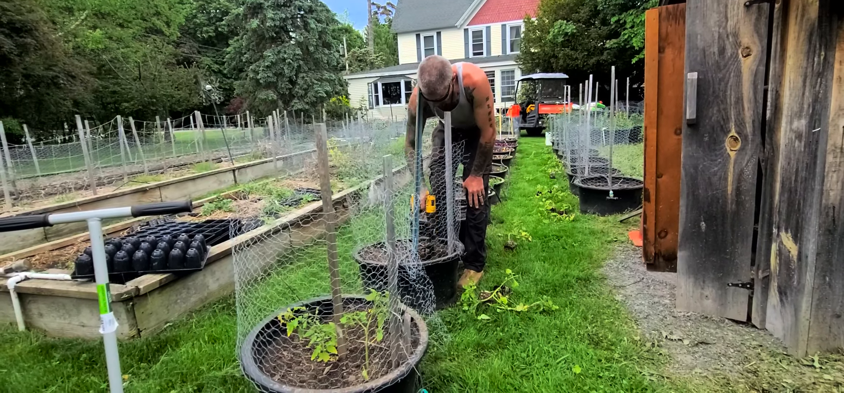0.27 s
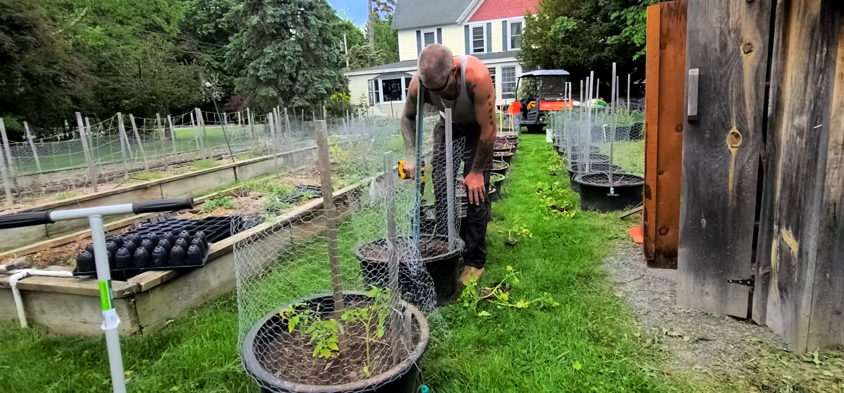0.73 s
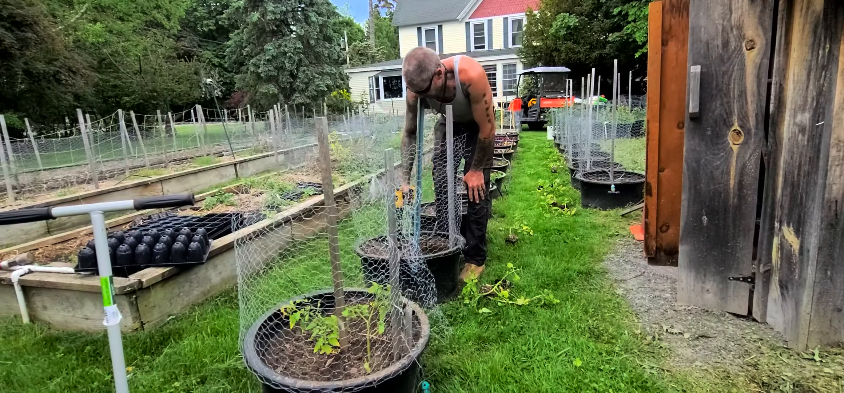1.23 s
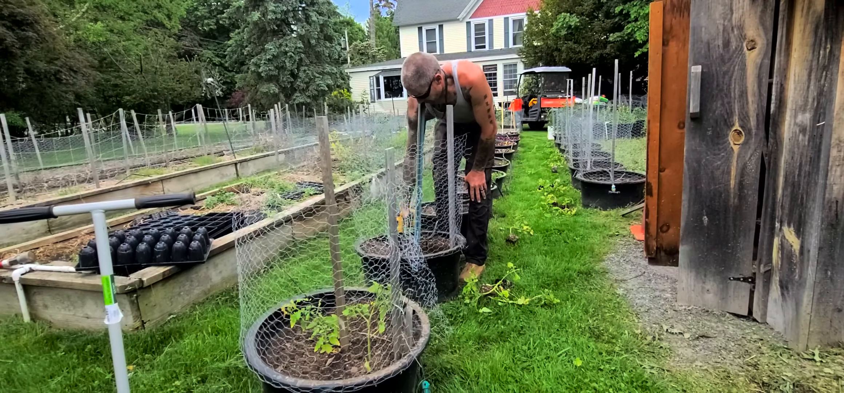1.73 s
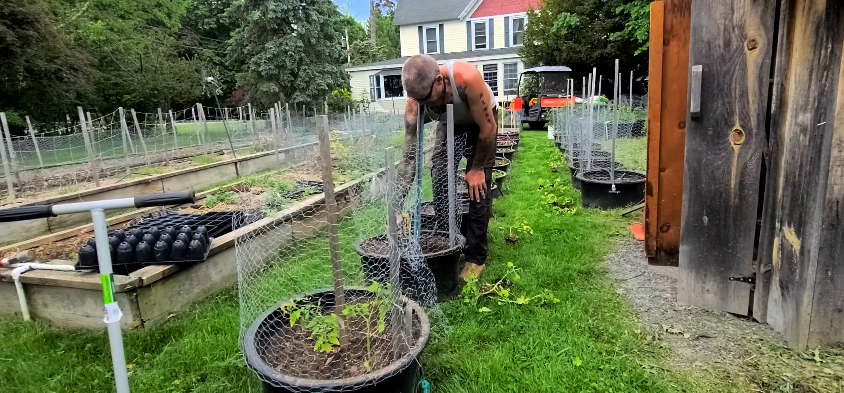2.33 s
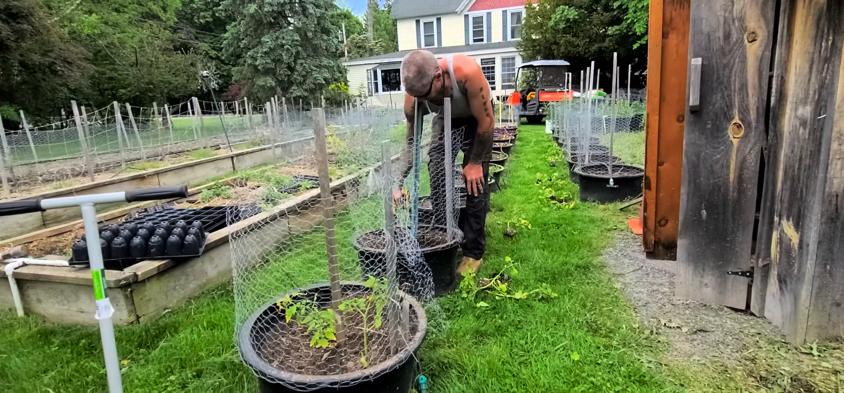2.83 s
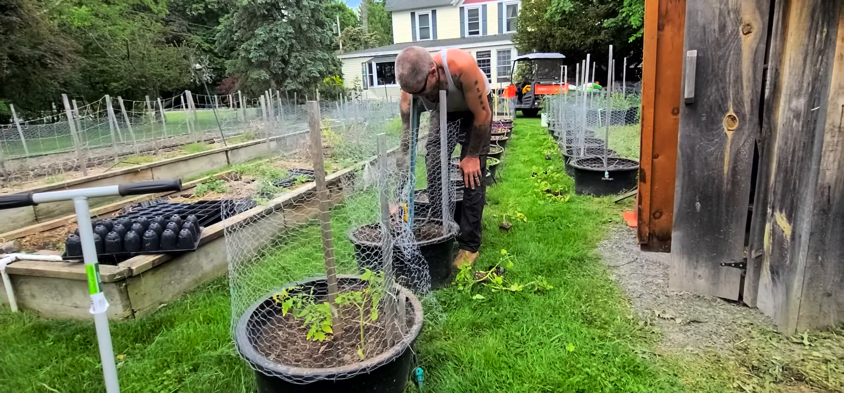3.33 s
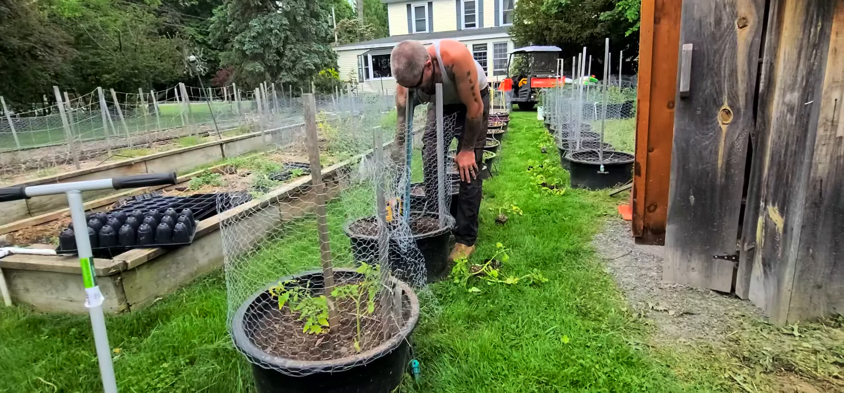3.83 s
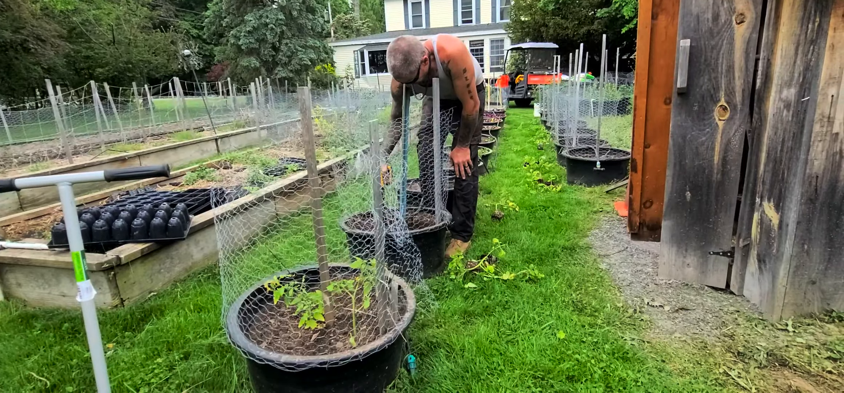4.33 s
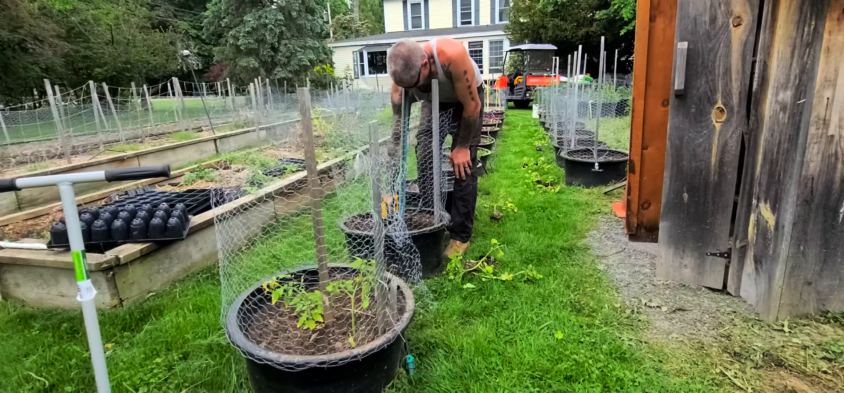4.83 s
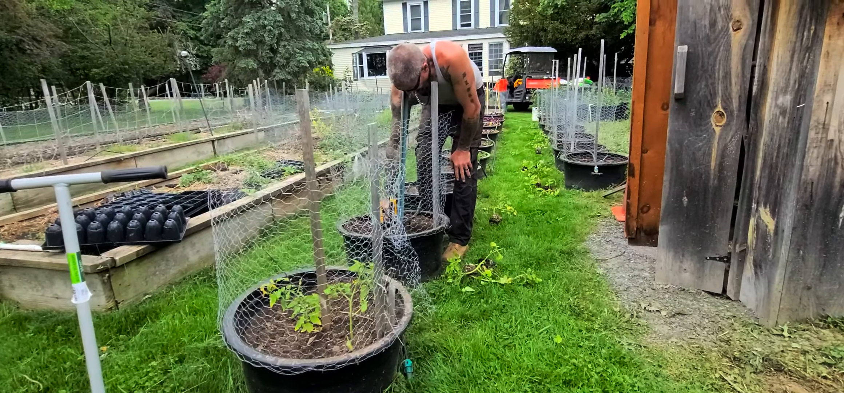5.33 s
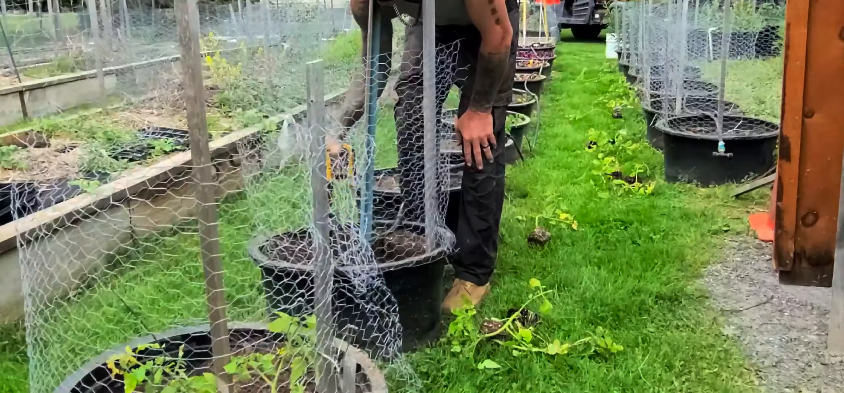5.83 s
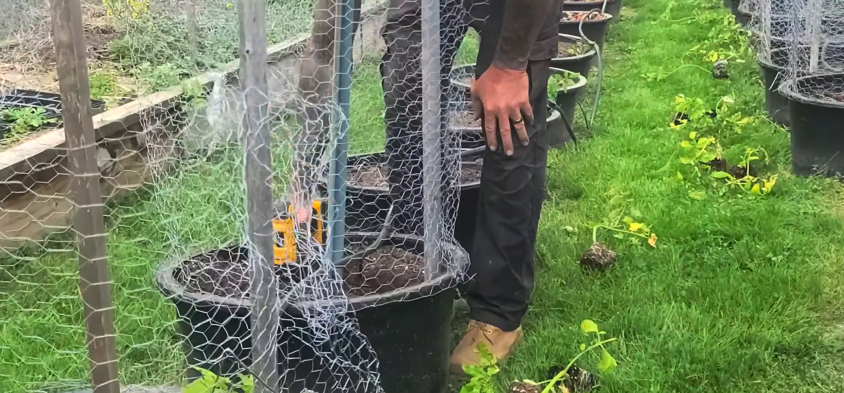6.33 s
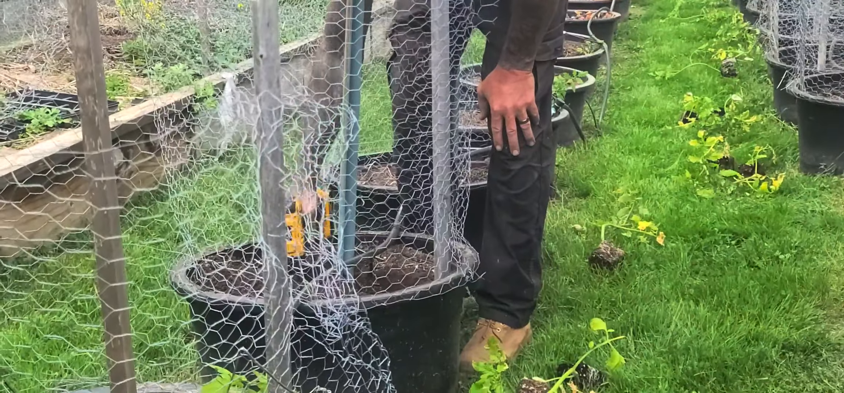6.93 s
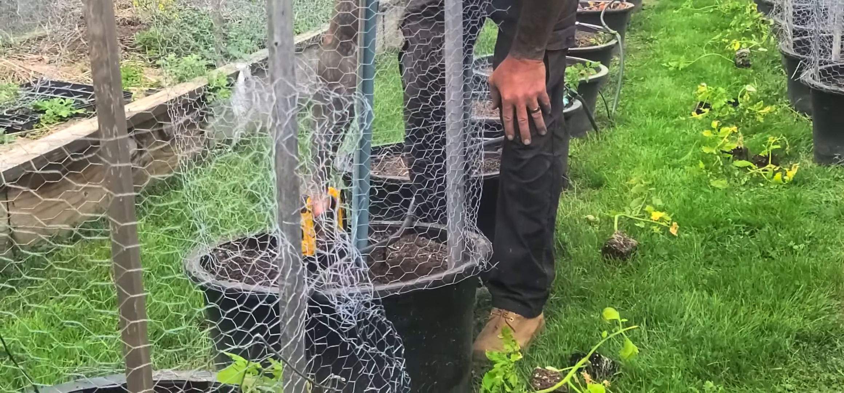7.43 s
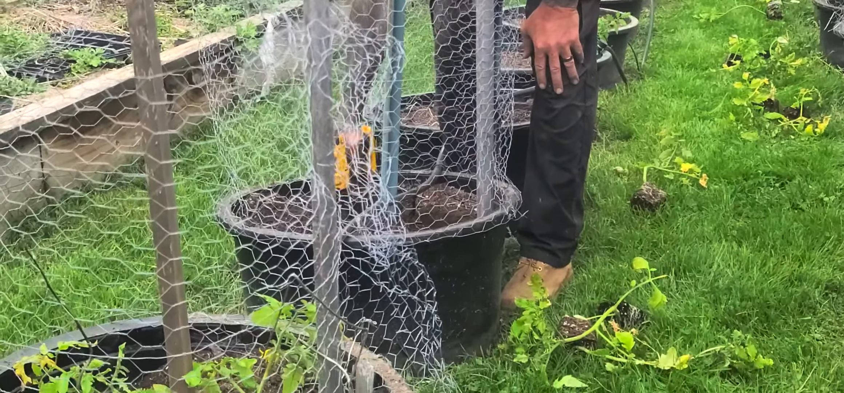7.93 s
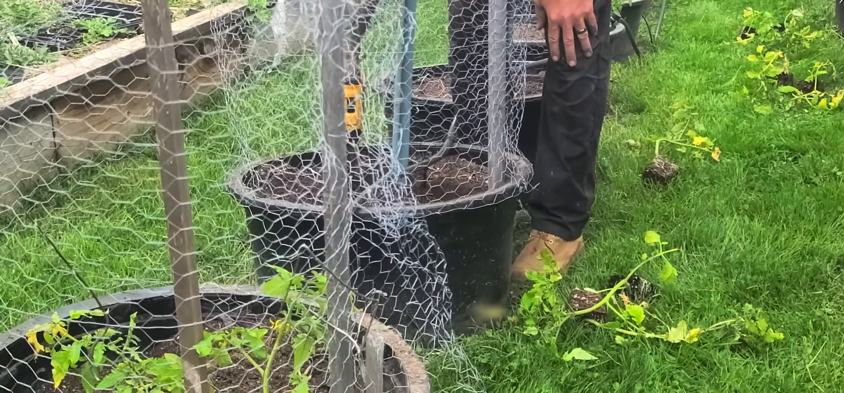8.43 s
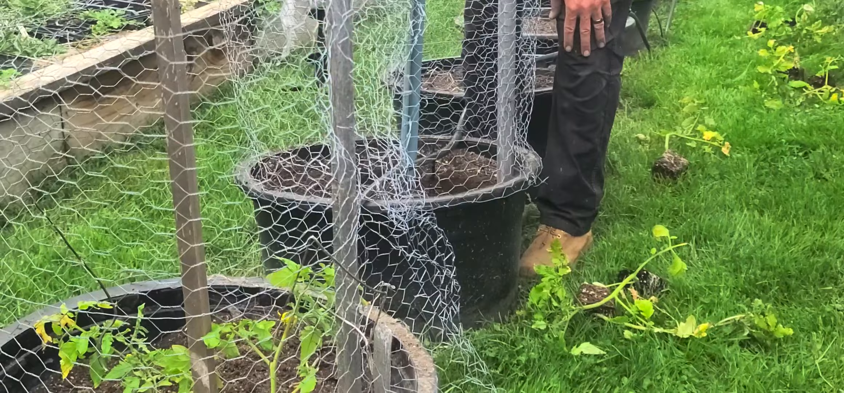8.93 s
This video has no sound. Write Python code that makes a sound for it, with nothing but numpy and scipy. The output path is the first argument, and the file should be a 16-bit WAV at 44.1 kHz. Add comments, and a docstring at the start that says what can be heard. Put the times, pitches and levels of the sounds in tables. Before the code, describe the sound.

A cordless drill is already whirring at 0 s, a few metres away in an open garden. Around 0.4 s it brakes with a soft pot thud and dry clacks. The pause has a gliding bird whistle at 0.55-0.8 s, a fainter one near 1.25 s, faint ticks and rustles, soft leaves and distant traffic. At 1.4 s a tiny electronic whine and trigger click lead into a quick spin-up by 1.6 s. The motor then runs continuously, whining over gear rattle and fan hiss, sagging and grinding harshly as the auger bites at about 1.8, 3.1, 4.8, 7.0 and 7.8 s, rising freer between. Bassy wind gusts thump the stereo microphone, mainly from 3.3 s. Dull pot knocks fall at 4.9, 8.1 and 8.7 s. The drill stops sharply near 8.9 s with a clack, small clicks and short bird chirps until 9.2 s.

```python
"""In a garden, a few metres away, a cordless drill with an auger stops, starts again and bores into potting soil.
The motor whines on multiples of its speed; noise bands make the gear rattle, fan hiss and grind under load.
Short noise bursts clack the brake, decaying sines knock the pot, and gliding sines whistle in the pauses.
Low noise buffets the two microphone ports as wind, over faint leaves and far traffic.
Narrow noise bands add faint high ticks, rustles and a thin steady high tone."""
import sys
import numpy as np
from scipy import signal
from scipy.fft import rfft, irfft, next_fast_len
from scipy.io import wavfile
from scipy.ndimage import uniform_filter1d

SR = 44100
rng = np.random.default_rng(int(sys.argv[2]) if len(sys.argv) > 2 else 0)


def store_wav(level_fs):
    """Save 16-bit WAV to argv[1]."""
    pcm = np.round(np.clip(np.atleast_2d(level_fs), -1, 1) * 32767)
    wavfile.write(sys.argv[1], SR, pcm.T.astype(np.int16))


N = 404838

# Spectra list (f/Hz, relative level per Hz/dB); tilt is left minus right.
# leaves and far traffic: spectrum
AIR_SPECTRUM = [(76, -50), (130, -19), (183, 6), (233, -38), (263, -0.5), (522, -8), (589, 2), (651, 2),
                (2200, 0), (4070, -9.5), (5400, -18), (6900, -17), (8800, -28), (11700, -21), (13600, -31),
                (16000, -29)]
AIR_DB = -59
# lift of the leaves over time: (t/s, level/dB)
LEAF_STIR = [(0, 2), (1.0, -0.5), (1.4, 0), (8.9, 3.5), (9.18, 6)]
# faint high ticks, rustles and a thin steady high tone: (t/s, length/s, f/Hz, width/Hz, level/dB)
HIGH_BANDS = [(0.61, 0.1, 11700, 900, -73), (0.748, 0.016, 6900, 500, -68), (0.748, 0.016, 5700, 500, -70),
              (0.975, 0.022, 7000, 500, -67), (1.15, 0.14, 11500, 600, -76), (1.36, 0.1, 11500, 600, -77),
              (0.5, 0.95, 14970, 60, -83)]

# wind buffet on the ports: spectrum
BUFFET_SPECTRUM = [(8.8, -38), (15, -7), (70, 3), (94, -6.5), (130, -25), (170, -51), (290, -120)]
# higher wind flutter: spectrum
FLUTTER_SPECTRUM = [(60, -35), (120, 0), (200, -5), (300, 1), (450, -10), (700, -35.5)]
# breeze between gusts: (t/s, buffet level/dB, tilt/dB, flutter level/dB)
BREEZE = [(0, -39, -20, -59), (0.62, -57, 2, -64), (0.69, -55, 0, -63), (0.8, -46, 0, -67),
          (1.1, -51, -8, -68), (1.27, -60, 7, -72), (1.9, -66, -3, -60.5), (2.4, -63, -1, -54),
          (2.9, -64, -7, -72), (3.3, -53, -5, -56.5), (4.05, -45, -8, -58), (4.13, -56, 4, -72),
          (4.22, -48, 10, -79), (4.65, -51, -13, -64.5), (5.1, -51, 3, -58), (6.0, -46, 5, -77),
          (6.15, -50, 5, -66), (6.8, -45, -10, -63), (6.9, -57, -13, -68), (7.15, -51, -5, -55),
          (7.5, -51, 0, -55), (8.2, -49.5, -8, -76), (8.9, -47, -5, -51), (9.18, -48, 0, -58.5)]
# gusts: (t/s, length/s, buffet level/dB, tilt/dB, flutter level/dB)
GUSTS = [(0.004, 0.13, -65, 5, -53), (0.218, 0.22, -35, -9.5, -69), (0.452, 0.17, -40, 8, -69),
         (0.823, 0.031, -50, 0, -81), (3.287, 0.07, -34.5, -12, -59), (3.475, 0.033, -37, -13, -67),
         (3.626, 0.042, -37, -12, -54), (3.709, 0.092, -29.5, -10, -59), (3.954, 0.13, -36.5, -9, -80),
         (4.264, 0.18, -41.5, -9, -67), (4.712, 0.045, -30.5, -10, -63), (4.81, 0.19, -30.5, -3, -68),
         (5.035, 0.048, -33, 2, -68), (5.11, 0.19, -40, 3, -63), (5.223, 0.33, -32.5, 2.5, -62),
         (5.543, 0.069, -37, -4, -63), (5.723, 0.23, -32.5, 2, -69), (6.02, 0.021, -38, 6, -68),
         (6.285, 0.038, -47, 9, -77), (6.495, 0.027, -48, -8, -54), (6.6, 0.089, -43.5, -3, -72),
         (6.733, 0.051, -47, -13, -80), (7.196, 0.025, -48, -5, -40), (7.257, 0.058, -30.5, -4, -57),
         (7.53, 0.043, -35.5, -11, -62), (7.61, 0.026, -40, -11, -60), (7.72, 0.051, -38, -3, -69),
         (7.816, 0.11, -36.5, 2, -66), (7.946, 0.029, -41, -8.0, -68), (8.03, 0.038, -43, -7, -65),
         (8.33, 0.12, -34, -8, -77), (8.474, 0.082, -39, -11, -83), (8.607, 0.046, -46, 17, -75),
         (8.765, 0.035, -39, -2, -48), (8.964, 0.12, -36.5, -6, -73)]
GUST_EDGE_S = 0.021
# sharp thumps of air: (t/s, level/dB, tilt/dB)
THUMPS = [(3.281, -47, 1), (3.35, -53, -11.0), (3.634, -46, -5), (3.712, -47, -13.5), (4.062, -47, 10.0),
          (4.726, -43, -17.0), (4.842, -38, -6), (5.026, -49, 8.5), (5.241, -40, 16), (5.309, -32, -0.5),
          (5.391, -48, -5), (5.488, -37, -16), (5.589, -50, -1.0), (5.745, -36, 5.0), (5.809, -35, -3),
          (5.879, -37, 5), (6.609, -44, 13), (7.194, -51, 2), (7.278, -32, 1), (7.419, -50, -1.5),
          (7.49, -52, -3), (7.804, -37, -14), (9.004, -36, -15)]
# air thump: spectrum
THUMP_SPECTRUM = [(60, 6.5), (110, 4), (160, 3.5), (250, -10), (350, -31), (600, -40)]
THUMP_RISE_S, THUMP_T60_S = 0.011, 0.17

# bird notes, one table each: (t/s, f/Hz, level/dB)
BIRD_NOTES = [
    [(0.55, 2380, -54), (0.554, 2320, -50), (0.592, 2400, -64), (0.65, 2640, -43), (0.694, 2470, -52),
     (0.72, 2130, -58)],
    [(8.945, 3100, -66), (8.976, 3200, -53), (8.986, 3269, -53)],
    [(0.745, 2660, -64), (0.77, 2660, -62), (0.8, 2640, -69)],
    [(0.72, 2260, -64), (0.745, 2170, -59), (0.77, 2130, -66)],
    [(9.142, 2810, -60), (9.155, 2660, -62), (9.18, 2240, -53)],
]
# fainter bird note: (t/s, f/Hz, level/dB)
FAINT_BIRD_NOTE = [(1.238, 4740, -70), (1.255, 4630, -70), (1.275, 4020, -67), (1.29, 3800, -70)]

# lead of the left port: (f/Hz, phase/rad)
PORT_LEAD = [(200, 0.5), (1030, 0.23), (1550, 1.24), (2580, 1.26), (2930, 4.1), (3790, 1.96), (4820, 4.05),
             (5770, 5.7), (7300, 11.1), (10000, 17.47), (14500, 20.4)]
# tool shifting sideways: (t/s, factor on the port lead)
SIDEWAYS_SHIFT = [(0, 0.61), (1.5, 0.76), (3, 0.89), (6, 0.95), (7.5, 0.79), (9.2, 0.7)]
# tilt between the ports: (f/Hz, tilt/dB)
PORT_TILT = [(60, 1), (110, 9), (200, 3), (380, -2), (700, -5), (1290, -7.5), (2380, -7), (4400, 0),
             (8120, -0.5), (15000, -5)]
# left-right likeness of the tool noise: (f/Hz, likeness 0-1)
PORT_LIKENESS = [(300, 0.75), (1500, 1), (4000, 0.72), (8000, 0.54), (15000, 0.43)]

# dull knocks on the pot: (t/s, level/dB, f/Hz)
KNOCKS = [(0.372, -19.5, 122), (4.898, -22.5, 116), (8.092, -25.5, 136), (8.679, -33.5, 240),
          (8.725, -17, 143)]
# brake, trigger and chuck: (t/s, level/dB, snap against body/dB, t60/s)
CLACKS = [(0.436, -21, -7.5, 0.035), (0.448, -32, -8, 0.03), (0.506, -39, -15, 0.027),
          (0.546, -27.5, -10.5, 0.023), (1.467, -34.5, -18, 0.035), (8.89, -19, -7, 0.037),
          (8.906, -29.5, -8, 0.04), (8.991, -42, 11, 0.026), (9.042, -34, -12, 0.028),
          (9.097, -46, -4, 0.02)]
# body of a clack: spectrum
CASING_SPECTRUM = [(400, -14), (800, -5.5), (1200, 6), (1600, 6.5), (2250, 4.5), (3200, -4), (4500, -20)]
# snap of a clack: spectrum
SNAP_SPECTRUM = [(2500, -7), (4500, 0), (7000, -3.5), (9000, -5), (16000, -20)]
# speed control whine before the motor turns: (start t/s, end t/s, f/Hz, level/dB)
SPEED_CONTROL = (1.418, 1.468, 3940, -57)
# gears taking up their slack: (t/s, level/dB)
GEAR_CREEP = [(1.41, -70), (1.44, -60), (1.47, -50)]

# motor speed, one table a run; it sags as the auger bites: (t/s, f/Hz)
MOTOR_RUNS = [
    [(0, 388.0), (0.13, 395.1), (0.36, 395.3), (0.412, 381.0), (0.46, 170)],
    [(1.47, 200.0), (1.5, 275.0), (1.53, 326.0), (1.56, 360.5), (1.6, 374.4), (1.71, 380.2), (1.79, 370.2),
     (1.89, 349.9), (2.18, 344.7), (2.3, 348.6), (2.37, 346.3), (2.42, 354.5), (2.46, 356.9), (2.5, 365.2),
     (2.59, 374.9), (2.95, 395.5), (3.1, 392.4), (3.24, 375.6), (3.37, 366.0), (3.48, 366.9), (3.53, 361.6),
     (3.79, 358.4), (3.85, 354.1), (4.05, 378.9), (4.45, 395.0), (4.71, 391.8), (4.89, 371.0),
     (4.99, 369.5), (5.04, 364.6), (5.1, 367.9), (5.18, 365.1), (5.22, 367.8), (5.32, 363.6), (5.47, 363.0),
     (5.74, 380.6), (5.87, 384.0), (6.03, 393.4), (6.18, 396.0), (6.31, 390.7), (6.38, 371.5),
     (6.41, 367.7), (6.59, 380.1), (6.9, 389.5), (7.02, 387.7), (7.14, 376.1), (7.51, 370.0), (7.61, 373.5),
     (7.72, 370.2), (7.86, 380.7), (7.95, 382.5), (8.22, 380.6), (8.83, 388.0), (8.858, 372), (8.878, 260),
     (8.92, 150)],
]
# trigger let go at the end of each run: t/s
TRIGGER_RELEASES = (0.4, 8.835)
TREMBLE, TREMBLE_HZ = .0015, 25  # the speed trembles by this share
# layer levels: (t/s, then rattle, free mesh, fan hiss, top hiss, upper orders, each level/dB)
LAYER_LEVELS = [(0, -36, -49, -38.5, -51, -53), (0.4, -36, -57, -39.5, -53, -49),
                (1.55, -35, -45, -46, -62, -73), (1.72, -31, -46, -41.5, -57, -56),
                (2.15, -33.5, -47, -40.5, -54, -54), (2.6, -34, -43, -42, -47, -62),
                (3.0, -35, -51, -42, -50, -66), (3.3, -33.5, -49, -40, -53, -65),
                (3.9, -35, -48.5, -40.5, -50, -54), (4.55, -34, -49, -43, -53, -54),
                (4.9, -33.5, -49.5, -40, -57, -55), (5.5, -34.5, -47, -40.5, -51, -58),
                (6.1, -34.5, -48, -39.5, -40, -55), (6.4, -32.5, -44.5, -37, -44, -48),
                (7.0, -33.5, -42.5, -38.5, -42, -47.5), (7.15, -30.5, -49.5, -36.5, -45, -45),
                (7.75, -31, -44, -36, -44, -48), (8.4, -31, -58, -36.5, -45, -45),
                (8.85, -33.5, -43, -36, -60, -49)]
RUNNING_HZ = 348  # below this speed the layers change level
# level change for each halving of speed: (rattle, mesh, fan, top, upper orders, each level/dB)
LAYER_FADES = [-9, -11, -7, -11, -12]
HUM_FADE_DB, FOURTH_FADE_DB, FIFTH_FADE_DB = -10, -30, -6  # for each halving of speed
BRAKE_DB_PER_S, SLOT_BRAKE_DB_PER_S = -100, -190  # the slot whine has its own rate
# hum at the turning speed: (t/s, level/dB)
HUM_LEVEL = [(0.0, -48), (0.02, -51), (0.39, -48), (0.49, -71), (1.45, -78), (1.58, -49), (1.7, -48),
             (2.09, -61), (2.66, -53), (3.06, -60), (3.2, -52), (4.31, -53), (4.61, -60), (4.93, -47),
             (4.98, -53), (5.54, -51), (5.62, -58), (5.96, -54), (6.18, -61), (6.36, -45), (6.63, -52),
             (6.73, -46), (6.95, -53), (7.07, -44), (7.69, -47), (7.74, -43), (7.89, -48), (8.85, -45)]
# fourth order: (t/s, level/dB)
FOURTH_LEVEL = [(0, -43.5), (0.4, -52), (1.5, -69), (2.6, -42), (2.95, -48), (3.2, -51), (4.0, -52),
                (4.2, -44), (4.5, -58), (4.8, -64), (6.0, -50), (7.6, -51), (7.8, -50), (8.2, -45),
                (8.55, -44), (8.8, -46)]
# fifth order, rising and falling: (t/s, level/dB)
FIFTH_LEVEL = [(0.0, -54), (0.33, -39), (1.6, -54), (1.79, -54), (1.82, -44), (1.89, -42), (2.29, -40),
               (2.58, -54), (3.02, -39), (3.09, -41), (3.16, -54), (3.56, -43), (3.94, -44), (4.14, -54),
               (4.26, -45), (4.47, -50), (4.64, -40), (4.78, -50), (4.95, -42), (5.31, -48), (5.45, -40),
               (5.57, -47), (5.76, -44), (5.86, -54), (6.18, -38), (6.3, -49), (6.51, -38), (6.84, -45),
               (7.01, -39), (7.38, -48), (7.51, -44), (7.59, -50), (8.57, -36), (8.83, -42)]
# slot whine: (t/s, level/dB)
SLOT_LEVEL = [(0.0, -39), (0.2, -39.5), (0.4, -39.0), (1.5, -42), (1.6, -43), (1.68, -40.0), (1.74, -47.8),
              (1.79, -40.0), (1.83, -44.4), (1.94, -41.7), (2.0, -45.6), (2.03, -54.1), (2.08, -49.5),
              (2.1, -58.0), (2.22, -53.1), (2.27, -58.0), (2.31, -46.5), (2.4, -48.8), (2.57, -36.3),
              (2.65, -41.5), (2.72, -37.4), (2.78, -41.2), (2.95, -35), (3.05, -39), (3.2, -37.5),
              (3.41, -41.5), (3.48, -37.8), (3.6, -44.7), (3.72, -39.4), (3.92, -48.8), (4.05, -41),
              (4.1, -47), (4.17, -46), (4.28, -38), (4.43, -37.4), (4.55, -43.7), (4.62, -36.7),
              (4.84, -43.4), (4.89, -46), (5.04, -44), (5.09, -57.6), (5.18, -50.8), (5.27, -57.0),
              (5.32, -51.3), (5.38, -58.0), (5.42, -47.2), (5.54, -53.3), (5.66, -40.7), (5.71, -45.3),
              (5.77, -40.5), (5.95, -44.4), (6.04, -36.7), (6.14, -39.8), (6.23, -35.3), (6.33, -44.8),
              (6.37, -39.4), (6.58, -39.7), (6.87, -44), (6.93, -36.7), (7.08, -45), (7.25, -39.2),
              (7.37, -41.2), (7.49, -52.2), (7.59, -45.6), (7.68, -58.0), (7.73, -42.7), (7.88, -43),
              (7.99, -48), (8.09, -40.7), (8.2, -37.4), (8.38, -35.2), (8.46, -45.7), (8.54, -38.0),
              (8.64, -42.1), (8.83, -36.5)]
SLOT_SWELL_DB, SLOT_SWELL_HZ = 2.0, 18  # the slot whine swells and fades unevenly
# beaming of the slot whine from the vents: (t/s, left lead before unwrapping/rad, tilt/dB)
VENT_BEAM = [(0.1, 2.3, 0.0), (0.3, 1.0, -6.0), (1.55, 1.8, -6.0), (1.62, 2.5, -2.0), (1.7, 2.9, -3.0),
             (1.8, 1.6, -1.0), (1.95, 1.6, -3.0), (2.4, 2.4, -4.0), (2.6, 2.3, -3.0), (2.8, 4.3, 0.0),
             (3.1, 4.5, -1.0), (3.4, 2.6, -6.0), (3.7, 1.7, 1.0), (4.0, 3.7, -6.0), (4.2, 4.0, -1.0),
             (4.45, 4.2, -7.0), (4.7, 4.3, -5.0), (4.95, 5.2, -5.0), (5.5, 4.5, 0.0), (5.7, -0.8, 4.0),
             (5.9, 2.3, -5.0), (6.1, 4.7, -4.0), (6.25, 3.7, -8.0), (6.45, 1.5, 1.0), (6.7, 2.3, -1.0),
             (6.95, 1.8, -5.0), (7.2, 4.3, -8.0), (7.4, 3.4, -6.0), (7.8, 4.5, 0.0), (8.1, 1.4, -6.0),
             (8.3, 1.9, -5.0), (8.55, 2.3, 3.0), (8.8, 1.3, 2.0)]
# upper orders: (multiple of motor speed, relative level/dB)
UPPER_ORDERS = [(13, -6), (21, 0), (22, -8), (24, -8)]
# high orders riding on the fan hiss: (multiple of motor speed, level against fan hiss/dB)
COMB_ORDERS = [(9, -20), (11, -20), (15, -19), (17, -19), (20, -20), (22, -19), (23, -17), (24, -18),
               (25, -17), (26, -20), (27, -19), (28, -20), (29, -20), (30, -19), (31, -19), (32, -19),
               (33, -20), (34, -18), (35, -21), (36, -21), (38, -21)]
COMB_SWELL_DB, COMB_SWELLS_PER_S = 5, 8
MESH_RATIO = 3.573  # tooth contacts of the loaded gear stage per motor turn
# first five mesh harmonics: (smear level/dB, smear width/Hz, steady line as a share of the smear)
MESH_HARMONICS = [(-23, 280, 0.66), (-7.5, 285, 0.031), (-22, 60, 1.0), (-16, 150, .6), (-21.5, 95, 0)]
# upper mesh harmonics as the gearbox turns away: (t/s, third level/dB, fourth and fifth level/dB)
MESH_SHINE = [(1.6, -8, -8), (1.9, 0, -2), (2.0, 4, 1), (2.35, 5, 3), (2.5, -3, -2), (3.2, -6, -2),
              (3.5, -5, 2), (3.85, -4, 2), (4, -6, -3), (4.9, -3, -3), (5.5, -2, -2), (6, -3, 0),
              (7.5, -5, -3), (8.9, -4, -2)]
# broad band of the loaded gears: spectrum
GRIND_SPECTRUM = [(3500, -24), (4600, 6.5), (5300, 5.5), (5900, 5.5), (7000, -37)]
# gear rattle through the housing: spectrum
HOUSING_SPECTRUM = [(500, -37), (740, -12.5), (930, -18.5), (1100, -3.5), (1370, -5.5), (1480, -1.5),
                    (1620, 0), (1780, -1), (1950, -5), (2200, -11.5), (2600, -7), (3000, -6), (4200, -18),
                    (6000, -26.5)]
# housing resonances: (f/Hz, width/Hz)
HOUSING_FACES = [(780, 210), (1380, 52), (1540, 53), (1760, 116), (2000, 96), (2300, 150)]
# swell of the housing resonances as the tool turns: (t/s, then lift of each resonance/dB)
FACE_LIFTS = [(0.2, 5.5, 9.5, 6.5, -5, 3, 12), (1.6, 4, 6.5, 1.5, -5, 2, 4),
              (2.1, -0.5, 0.5, -2.5, -1, 0, 5), (2.95, 6.5, 11.5, 0, 1, -1, 6),
              (3.65, 4, 4.5, 1, 4.5, -2, 8), (4.5, 5.5, 7.5, 0.5, 0, 5.5, 0.5),
              (5.2, 3, 8.5, -9, 5, 1.5, 4.5), (6.0, 2, 7.5, -1, 0.5, 5.5, 4.5),
              (6.8, 2.5, 7, -8, 4, 4.5, 4.5), (7.45, -5, 7, -9, -1, 0.5, 7.5),
              (8.0, -5.5, 2.5, -3, -3, 5, 7), (8.45, -1, 10, -1.5, -2, 5, 4), (8.9, 3, 8, 2, -9, 11, 1)]
# fan hiss: spectrum
FAN_SPECTRUM = [(2500, -40), (3300, 7), (4200, 5.5), (5300, 3.5), (6500, 7), (8000, 3.5), (10000, 3),
                (11500, 7), (13000, -0.5), (16000, -24)]
# top hiss: spectrum
TOP_SPECTRUM = [(11500, -22.5), (13000, -6), (14300, 8.5), (15200, -6), (16500, 4)]
# pushes into the soil: (t/s, length/s, mesh gain/dB, top hiss gain/dB, jolt at first bite/dB)
PUSHES = [(1.758, 0.55, 12, 11, -2), (3.108, 0.74, 13, 12, 0), (4.753, 0.76, 11, 14, 1.5),
          (5.675, 0.062, -5, -1, 0), (6.307, 0.035, 13, 12, 3.5), (7.025, 0.62, 12, 8, 2),
          (7.783, 0.68, 8, 1, -2)]
BITE_S, LIFT_S, JOLT_S = 0.012, 0.18, 0.048  # load comes on, load eases, jolt dies away

BAND_EDGE_HZ = 15740
LEFT_RIGHT = np.array([[.5], [-.5]])  # splits a tilt or lead evenly over the ports


def gain_of(db):
    """Decibels to a factor."""
    return 10 ** (np.asarray(db) / 20)


def evened(x):
    """Scales to rms 1."""
    return x / np.sqrt(np.mean(x ** 2) + 1e-20)


def read(points, hz):
    """Reads a table on a log-frequency axis."""
    f, value = np.transpose(points)
    return np.interp(np.log(hz + 1), np.log(f + 1), value)


def follow(rows, t):
    """Each column of a time table, read at the times t."""
    at, *columns = np.transpose(rows)
    return [np.interp(t, at, column) for column in columns]


def unroll(rows):
    """Start time and the columns of a time table, one value a sample."""
    start, end = rows[0][0], rows[-1][0]
    return start, follow(rows, np.arange(start, end, 1 / SR))


def add(mix, s, sound):
    """Mixes a sound in at time s."""
    part = mix[round(s * SR):][:len(sound)]
    part += sound[:len(part)]


def coloured(x, spectrum):
    """Gives x a spectrum, rms 1."""
    size = next_fast_len(x.shape[-1])
    tint = gain_of(read(spectrum, np.fft.rfftfreq(size, 1 / SR)))
    shaped = irfft(rfft(x, size) * tint, size)
    return evened(shaped[..., :x.shape[-1]])


def patchy(x, patchy_db, size=512, start=None):
    """Random patches of level drift over time and frequency; given a start time, the housing bands turn too."""
    hz, t, z = signal.stft(x, SR, nperseg=size, noverlap=size // 2)
    patches = rng.standard_normal(z.shape[-2:])
    patches = uniform_filter1d(patches, size=3 * 512 // size, axis=0)  # over frequency
    patches = uniform_filter1d(patches, size=30 * 512 // size, axis=1)  # over time
    db = patchy_db * evened(patches)
    if start is not None:
        for (centre_hz, width), lift_db in zip(HOUSING_FACES, follow(FACE_LIFTS, start + t)):
            db = db + np.exp(-.5 * ((hz[:, None] - centre_hz) / width) ** 2) * lift_db
    y = signal.istft(z * gain_of(db), nperseg=size, noverlap=size // 2)[1]
    return evened(y[..., :x.shape[-1]])


def wander(count, hz):
    """Slow complex random drift up to about hz, rms 1 before interpolation."""
    step = 16  # samples between drawn points
    r = np.exp(-np.pi * hz * step / SR)
    a, b = rng.standard_normal((count // step + 2, 2)).T
    slow = signal.lfilter([1], [1, -2 * r, r ** 2], a + 1j * b)
    slow = slow / np.sqrt(np.mean(abs(slow) ** 2))
    return np.interp(np.arange(count) / step, np.arange(len(slow)), slow)


def garden():
    """Leaves and far traffic as a bed of coloured noise; ticks, rustles and a high tone as short narrow bands."""
    (stir_db,) = follow(LEAF_STIR, np.arange(N) / SR)
    air = coloured(rng.standard_normal((2, N)), AIR_SPECTRUM)
    out = gain_of(AIR_DB + stir_db) * patchy(air, patchy_db=1.5)
    for s, length, hz, width, db in HIGH_BANDS:
        count = round(length * SR)
        band = [(hz - width, -40), (hz - width / 2, 0), (hz + width / 2, 0), (hz + width, -40)]
        detail = np.hanning(count) * coloured(rng.standard_normal((2, count)), band)
        add(out.T, s, (gain_of(db) * detail).T)
    return out


def thump(db, tilt_db):
    """A short low puff of air, mostly shared by the two ports."""
    t = np.arange(4096) / SR
    shared, left, right = rng.standard_normal((3, len(t)))
    puff = coloured(1.8 * shared + np.array([left, right]), THUMP_SPECTRUM)
    rise = np.sin(np.pi / 2 * np.minimum(t / THUMP_RISE_S, 1)) ** 2
    shape = rise * gain_of(db - 60 * t / THUMP_T60_S)
    return (gain_of(LEFT_RIGHT * tilt_db) * shape * puff).T


def wind():
    """Breeze and gusts of lumpy low swings and higher flutter, mostly unrelated at the ports, with thumps on top."""
    db, tilt_db, flutter_db = (np.resize(c, N) for c in unroll(BREEZE)[1])
    shared, left, right = rng.standard_normal((3, N))
    eddies = (.5 * shared + np.array([left, right])) * gain_of(2.1 * wander(N, 3.1).real)
    low, high = coloured(eddies, BUFFET_SPECTRUM), coloured(eddies, FLUTTER_SPECTRUM)
    out = gain_of(LEFT_RIGHT * tilt_db) * (gain_of(db) * low + gain_of(flutter_db) * high)
    t = np.arange(N) / SR
    for start, length, db, tilt_db, flutter_db in GUSTS:
        end = start + length
        span = slice(max(round((start - GUST_EDGE_S) * SR), 0), round((end + GUST_EDGE_S) * SR))
        inside_s = np.minimum(t[span] - start, end - t[span])
        swell = np.sin(np.pi / 2 * np.clip(.5 + inside_s / (2 * GUST_EDGE_S), 0, 1)) ** 2
        buffet = np.array([evened(port) for port in low[:, span]])
        gust = gain_of(db) * buffet + gain_of(flutter_db) * evened(high[:, span])
        out[:, span] += swell * gain_of(LEFT_RIGHT * tilt_db) * gust
    for s, *puff in THUMPS:
        add(out.T, s - THUMP_RISE_S / 2, thump(*puff))
    return out


def echoes(x, t60):
    """Sparse reflections from fence, shed and house; other taps for each port."""
    t = np.arange(round(.4 * SR)) / SR
    signs = rng.choice([-1., 1.], (2, len(t)))
    sparse = rng.random((2, len(t))) < .05
    taps = signs * sparse * gain_of(-60 * t / t60) * (t > .002)
    taps = taps / np.linalg.norm(taps, axis=1, keepdims=True)
    return signal.oaconvolve(x[None], taps, axes=1)[:, :N]


def whistle(rows):
    """A single gliding sine, faded at both ends."""
    s, (hz, db) = unroll(rows)
    tone = np.sqrt(2) * np.sin(2 * np.pi * np.cumsum(hz) / SR)
    return s, gain_of(db) * tone * signal.windows.tukey(len(hz), .2)


def birds():
    """Gliding whistles a little to the left, with echoes."""
    bird = np.zeros(N)
    for rows in BIRD_NOTES + [FAINT_BIRD_NOTE]:
        add(bird, *whistle(rows))
    return bird * gain_of([[1.5], [-1.5]]) + gain_of(-10) * echoes(bird, .4)


def ports(tool):
    """Each port hears the tool with a lead and tilt; noise from its other faces makes the two unlike."""
    hz, t, (like, other) = signal.stft(tool, SR, nperseg=512, noverlap=256)
    same = np.clip(read(PORT_LIKENESS, hz), 0, 1)[:, None]
    lead = read(PORT_LEAD, hz)[:, None] * follow(SIDEWAYS_SHIFT, t)[0]
    half = gain_of(read(PORT_TILT, hz) / 2)[:, None] * np.exp(.5j * lead)
    apart = np.sqrt((1 - same) / (1 + same)) * other
    both = np.array([(like + apart) * half, (like - apart) / half])
    return signal.istft(both, nperseg=512, noverlap=256)[1][:, :N]


def knock(db, hz):
    """A soft thud on the soil-filled pot: three decaying sines."""
    t = np.arange(5000) / SR
    modes = [(1, 1), (1.7, 0.62), (2.77, 0.49)]  # (pitch ratio, amplitude)
    thud = sum(amplitude * np.sin(2 * np.pi * ratio * hz * t) for ratio, amplitude in modes)
    return gain_of(db - 60 * t / 0.038) * thud * np.minimum(t / 0.0058, 1)


def clack(db, snap_db, t60):
    """A short dry blow: a noise burst in the casing under a sharp snap."""
    t = np.arange(4096) / SR
    fall = gain_of(-60 * t / t60) * np.minimum(t / 0.0036, 1) ** 2
    body, snap = rng.standard_normal((2, len(t)))
    blow = coloured(body, CASING_SPECTRUM) + gain_of(snap_db) * coloured(snap, SNAP_SPECTRUM)
    return gain_of(db + 3.0) * fall * blow


def speed_control():
    """Electronic whine before the motor turns: a steady tone and its octave."""
    start, end, hz, db = SPEED_CONTROL
    s, tone = whistle([(start, hz, db), (end, hz, db)])
    _, octave = whistle([(start, 2 * hz, db - 1), (end, 2 * hz, db - 2)])
    return s, tone + octave


def gear_creep():
    """Gears take up their slack: rising noise through the housing."""
    s, (db,) = unroll(GEAR_CREEP)
    return s, gain_of(db) * coloured(rng.standard_normal(len(db)), HOUSING_SPECTRUM)


def push_shape(t, start, length):
    """Load of one push, 0-1, and the jolt of its first bite."""
    since = t - start
    load = np.clip(np.minimum(since / BITE_S, 1 + (length - since) / LIFT_S), 0, 1)
    jolt = np.clip(since / 0.019, 0, 1) * np.exp(-(np.maximum(since, 0) / JOLT_S) ** 2)
    return load, jolt


def order(angle, k, waver, lead=0.):
    """A tone at k times the shaft speed, wavering in level and phase."""
    wavering = 1 + waver * wander(len(angle), 40)
    return np.sqrt(2) * (np.exp(1j * k * angle) * wavering * np.exp(1j * lead)).real


def comb(t, angle):
    """Faint high shaft orders, each with its own phase and slow swell."""
    at = np.arange(t[0], t[-1] + 1, 1 / COMB_SWELLS_PER_S)
    swells = gain_of(COMB_SWELL_DB * rng.standard_normal((len(COMB_ORDERS), len(at))))
    return sum(gain_of(db) * np.interp(t, at, swell) * np.cos(k * angle + rng.uniform(0, 2 * np.pi))
               for (k, db), swell in zip(COMB_ORDERS, swells))


def beamed_whine(t, angle, slot_db, upper_db):
    """Slot whine beamed from the vents with a moving lead and tilt, and upper orders with fixed ones."""
    at, lead, tilt_db = np.transpose(VENT_BEAM)
    lead = np.interp(t, at, np.unwrap(lead))
    slot_gain = gain_of(slot_db + LEFT_RIGHT * np.interp(t, at, tilt_db))
    slot = slot_gain * order(angle, 12, .4, LEFT_RIGHT * lead)
    upper = sum(gain_of(db) * order(angle, k, .8, LEFT_RIGHT * 4) for k, db in UPPER_ORDERS)
    return slot + gain_of(upper_db + LEFT_RIGHT * 7) * upper


def gear_mesh(t, angle):
    """Worn teeth smear each harmonic of the tooth contacts into a narrow band."""
    third_db, higher_db = follow(MESH_SHINE, t)
    shine_db = [0, 0, third_db, higher_db, higher_db]
    mesh = 0
    for k, (db, width, steady) in enumerate(MESH_HARMONICS):
        smear = np.array([steady + wander(len(t), width) for _ in range(2)])
        carrier = np.exp(1j * (k + 1) * MESH_RATIO * angle)
        mesh = mesh + gain_of(db + shine_db[k]) * (carrier * smear).real
    return evened(mesh)


def pulsing_noise(angle, uneven_db, uneven_hz, turn_share):
    """Two noises of uneven strength, swelling a little once a turn."""
    uneven = gain_of(uneven_db * wander(len(angle), uneven_hz).real)
    return rng.standard_normal((2, len(angle))) * uneven * (1 + turn_share * np.cos(angle))


def drill(motor, release_s):
    """Motor orders, a rough gear mesh, housing rattle and fan hiss on one shaft.
    Columns: front face, noise from other faces, beamed whine left and right."""
    s, (turns_hz,) = unroll(motor)
    count = len(turns_hz)
    t = s + np.arange(count) / SR
    trembling = 1 + TREMBLE * wander(count, TREMBLE_HZ).real
    angle = 2 * np.pi * np.cumsum(turns_hz * trembling) / SR
    halvings = np.log2(np.maximum(RUNNING_HZ / turns_hz, 1))
    braked_s = np.maximum(t - release_s, 0)

    def slowed(db, fade_db):
        return db + fade_db * halvings + BRAKE_DB_PER_S * braked_s

    rattle_db, mesh_db, fan_db, top_db, upper_db = map(slowed, follow(LAYER_LEVELS, t), LAYER_FADES)
    for start, length, mesh_gain_db, top_gain_db, jolt_db in PUSHES:
        load, jolt = push_shape(t, start, length)
        rattle_db, fan_db = rattle_db + jolt_db * jolt, fan_db + jolt_db * jolt
        mesh_db, top_db = mesh_db + mesh_gain_db * load, top_db + top_gain_db * load
    hum_db = slowed(follow(HUM_LEVEL, t)[0], HUM_FADE_DB)
    fourth_db = slowed(follow(FOURTH_LEVEL, t)[0], FOURTH_FADE_DB)
    fifth_db = slowed(follow(FIFTH_LEVEL, t)[0], FIFTH_FADE_DB)
    slot_db = follow(SLOT_LEVEL, t)[0] + SLOT_BRAKE_DB_PER_S * braked_s
    slot_db += SLOT_SWELL_DB * np.sqrt(2) * wander(count, SLOT_SWELL_HZ).real

    tones = gain_of(hum_db) * (order(angle, 1, .15) + gain_of(-10) * order(angle, 2, .5))
    tones += gain_of(fourth_db) * order(angle, 4, .55)
    tones += gain_of(fifth_db) * order(angle, 5, .25)
    tones += gain_of(fan_db) * comb(t, angle)

    ticks = pulsing_noise(angle, 1.33, 81.0, 0.054)  # loose teeth
    rattle = patchy(coloured(ticks, HOUSING_SPECTRUM), patchy_db=3.5, size=1024, start=s)
    loaded = gear_mesh(t, angle) + gain_of(-8.5) * coloured(ticks, GRIND_SPECTRUM)
    swirl = pulsing_noise(angle, 1.66, 30.0, 0.036)  # air
    fan = patchy(coloured(swirl, FAN_SPECTRUM), patchy_db=2.0)
    top = patchy(coloured(swirl, TOP_SPECTRUM), patchy_db=2.0)
    noise = gain_of(rattle_db) * rattle + gain_of(mesh_db) * loaded
    noise += gain_of(fan_db) * fan + gain_of(top_db) * top

    faces = noise + tones * [[1], [0]]  # tones from the front face only
    columns = np.vstack([faces, beamed_whine(t, angle, slot_db, upper_db)])
    return s, (columns * signal.windows.tukey(count, 600 / count)).T


def scene():
    """Garden air, wind and birds behind the drill and its hits through the ports."""
    tool, hits = np.zeros((N, 4)), np.zeros(N)
    for motor, release_s in zip(MOTOR_RUNS, TRIGGER_RELEASES):
        add(tool, *drill(motor, release_s))
    for s, *blow in CLACKS:
        add(hits, s, clack(*blow))
    for s, *blow in KNOCKS:
        add(hits, s, knock(*blow))
    add(hits, *speed_control())
    add(hits, *gear_creep())
    like, other, *beamed = tool.T
    near = ports(np.array([like + hits, other])) + beamed
    reflected = gain_of(-7.0) * echoes(other + hits, 0.16)
    return garden() + wind() + birds() + reflected + near


def record(dry):
    """Rolls off everything above the band edge with a linear-phase low-pass."""
    low_pass = signal.firwin(511, BAND_EDGE_HZ, window=("kaiser", 9), fs=SR)
    return signal.oaconvolve(dry, low_pass[None], "same")


dry = scene()
out = record(dry)
store_wav(out)
```